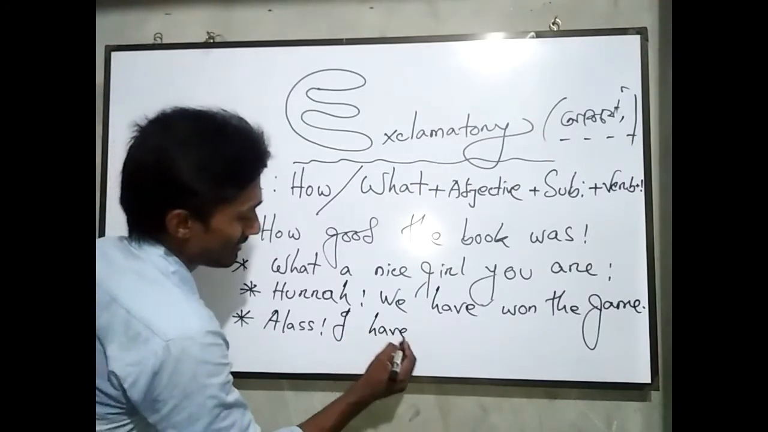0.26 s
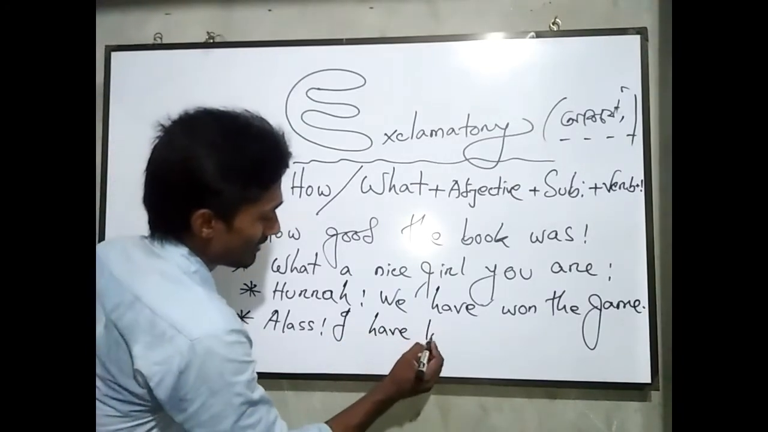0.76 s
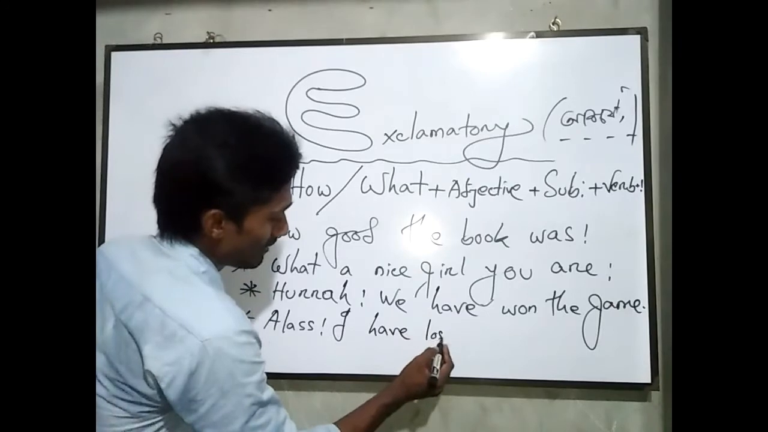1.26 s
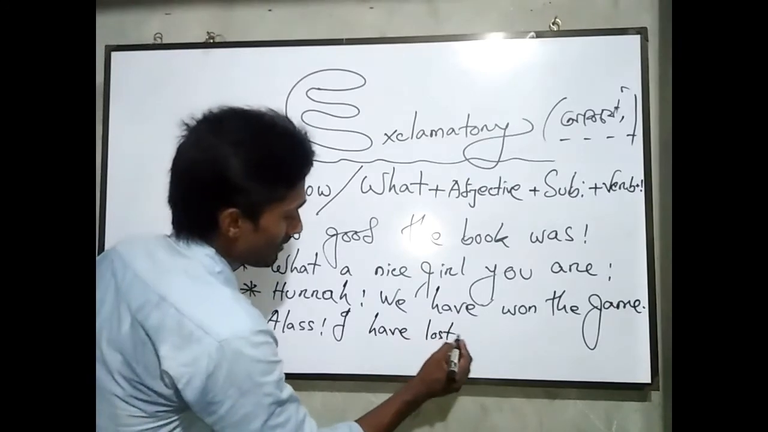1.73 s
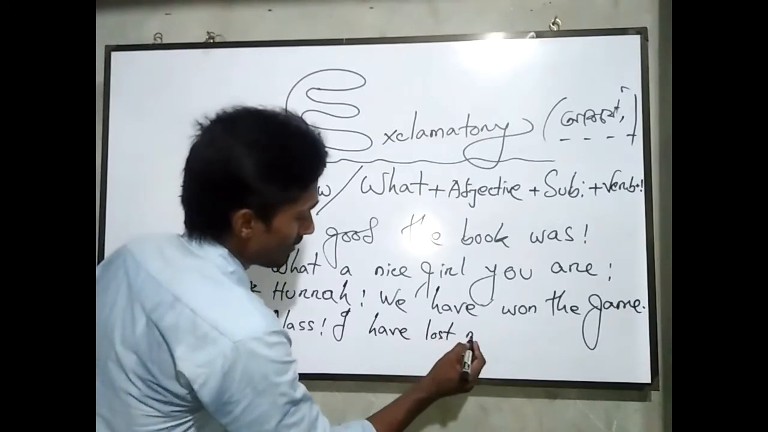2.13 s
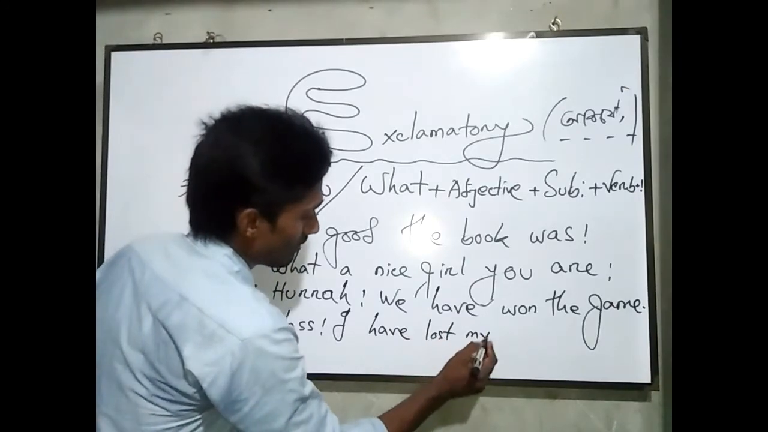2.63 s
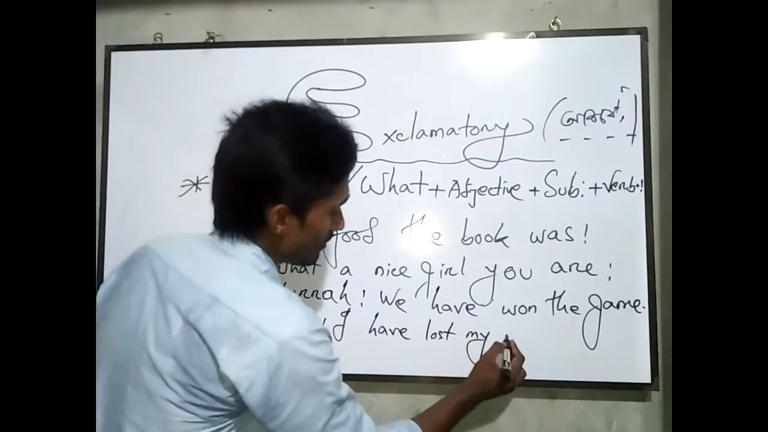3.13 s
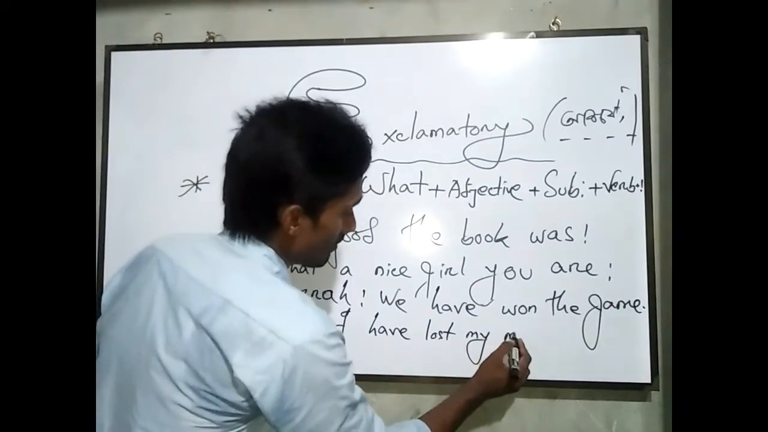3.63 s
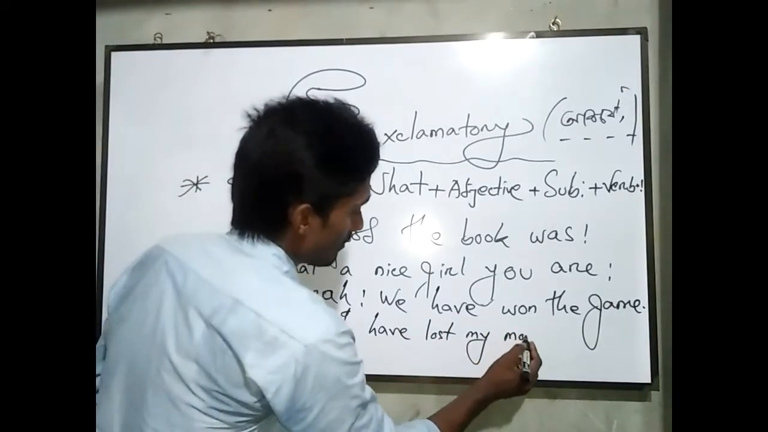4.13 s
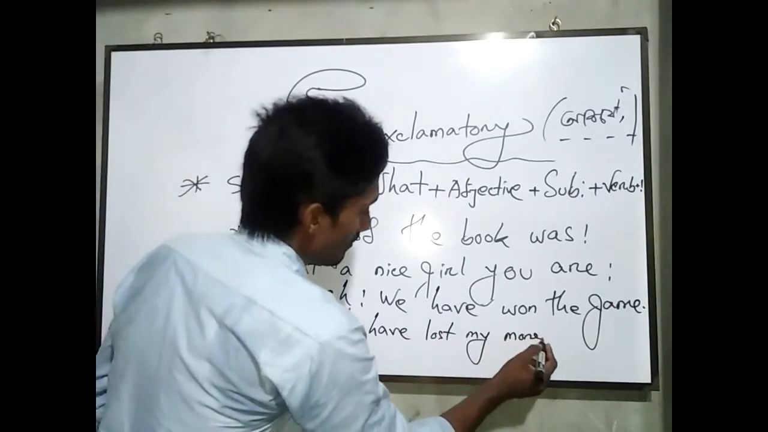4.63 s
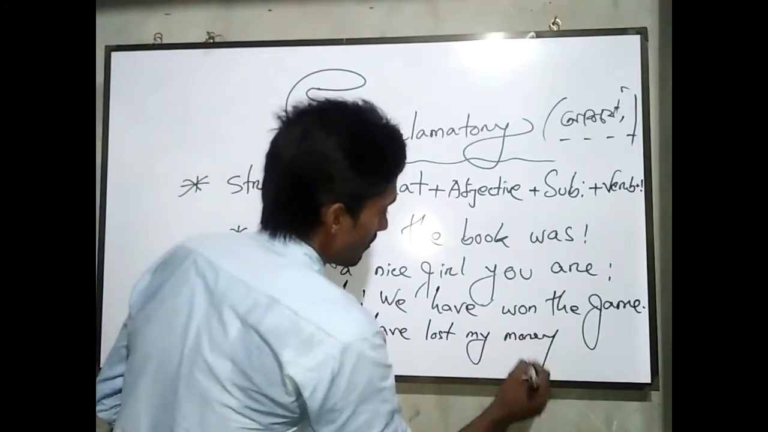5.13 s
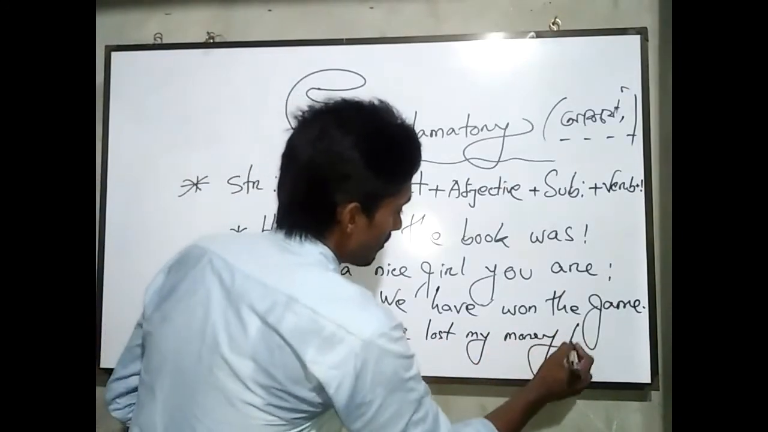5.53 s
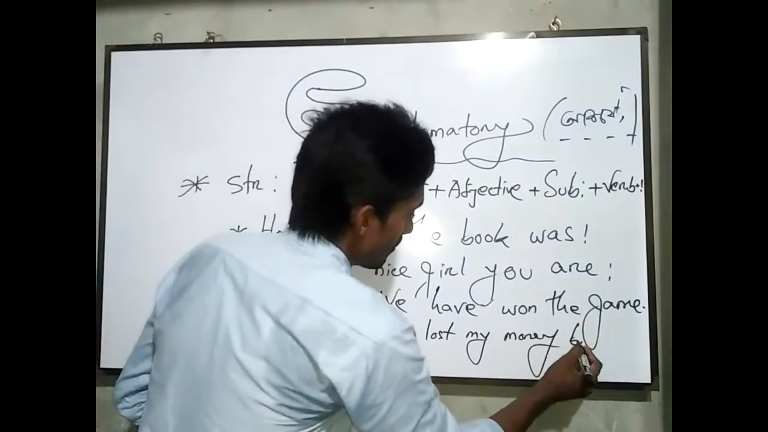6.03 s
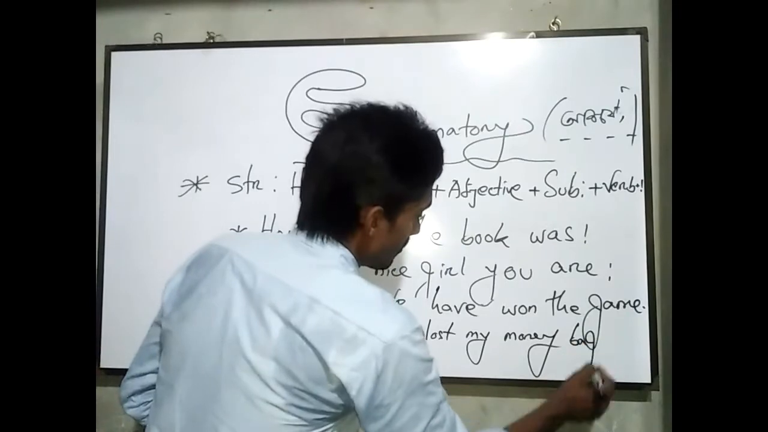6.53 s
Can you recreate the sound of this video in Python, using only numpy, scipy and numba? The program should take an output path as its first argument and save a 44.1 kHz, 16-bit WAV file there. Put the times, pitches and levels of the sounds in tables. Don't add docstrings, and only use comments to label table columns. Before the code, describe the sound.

In a bare room, a marker writes on a wall whiteboard a couple of metres from a phone. Quick, bright, dry hisses with faint barrel squeaks come in uneven bursts, mixed with small tip ticks and occasional knuckle knocks. Soft hand thuds fall mostly in the first four seconds, hardest just before two. A low fan drone, room rumble and light hiss dominate, and a distant machine hum rises late.

```python
import sys
import numpy as np
from scipy import signal
from scipy.fft import rfft, irfft, next_fast_len
from scipy.io import wavfile
from scipy.ndimage import uniform_filter1d
from numba import njit

SR = 44100
rng = np.random.default_rng(int(sys.argv[2]) if len(sys.argv) > 2 else 0)


def transcribe(signal):
    frames = np.atleast_2d(signal).T
    limited = np.clip(frames, -1, 1)
    pcm = np.round(limited * 32767).astype(np.int16)
    wavfile.write(sys.argv[1], SR, pcm)


def boost(x):
    u = np.asarray(x, float) / 20
    return 10 ** u


N = 298599

# f/Hz, density/dB per Hz
AIR_SPECTRUM = [(36, -17), (60, -16), (100, -20), (250, -24), (600, -38.5), (1000, -41), (1500, -46.5),
                (2500, -53), (4000, -54), (6700, -55.5), (7200, -51), (7700, -55.5), (11500, -59.5),
                (14500, -56)]
# t/s, gain/dB
MACHINE_GAIN = [(0, -3), (.5, -9), (4.2, -8.5), (5.0, -1), (6.77, 0)]
# f/Hz, width/Hz, level/dB
MACHINE_BANDS = [
    (67.7, 8, -50),
    (155.1, 8.9, -62),
]
# t/s, level/dB
FAN_DRONE = [(0.0, -41.5), (0.43, -51), (2.75, -42), (2.94, -50), (3.67, -43), (3.71, -47.5), (4.54, -43),
             (4.58, -56), (4.84, -42), (4.88, -55.5), (5.19, -38.5), (5.24, -46.5), (6.75, -43),
             (6.77, -51)]
# f/Hz, width/Hz, level/dB
BLADE_BANDS = [
    (52.06, 11.7, 0),
]
# f/Hz, width/Hz, level/dB
MOTOR_BANDS = [(98.4, 2.6, -64.5), (155.4, 13.6, -70), (202.8, 14.7, -64.5), (252.9, 19.7, -66.5),
               (317.7, 36, -72), (133.2, 7.2, -64.5)]
# t/s, peak/dB, boom re peak/dB
HAND_THUDS = [
    (0.514, -40.5, -2.5),
    (0.761, -61, -3),
    (1.47, -51, 10),
    (1.731, -48, 6),
    (1.909, -34, -4.5),
    (2.471, -49.5, 8),
    (3.13, -55.5, 3),
    (3.902, -47.5, 0),
]
# f/Hz, level/dB, t60/s
BOARD_MODES = [(306, 0, 0.036), (348, 3.5, 0.08), (417, 2.5, 0.039), (554, -5, 0.051), (714, -16, 0.076)]
# f/Hz, level/dB, t60/s
BOOM_MODES = [(73, -13, 0.2), (96, 7, 0.16), (126.4, 10, 0.13)]
# t/s, peak/dB, ring f/Hz
KNUCKLE_KNOCKS = [(1.175, -50, 498), (1.547, -58, 625), (3.041, -55, 533), (5.243, -50, 507),
                  (5.432, -52, 417)]
# t/s, peak/dB, ring f/Hz, treble re peak/dB
TIP_LANDINGS = [(0.3838, -57.5, 1410, 8), (0.418, -66.5, 1410, 15.5), (1.3544, -71, 1380, -3),
                (1.547, -57, 1150, -12), (3.9444, -61, 1110, -7), (4.1094, -56, 1140, -16),
                (4.323, -66, 1540, -8), (4.5211, -54.5, 1110, -17), (4.8179, -50.5, 1070, -16),
                (5.5177, -54.5, 1670, -25), (5.683, -52, 1310, -14), (6.3028, -55.5, 1680, -25),
                (6.4194, -58, 1210, -10), (0.3007, -55.5, 1910, -9), (1.0919, -60, 2240, -10),
                (1.7245, -58, 1760, -10), (2.4708, -64, 2110, -4), (3.036, -56.5, 2120, 0),
                (3.1233, -58.5, 2030, -8), (3.2465, -66, 2010, -13), (3.3039, -61, 2020, -14),
                (3.9115, -59.5, 2120, -9), (5.4261, -62, 2090, 0), (5.6256, -63, 2000, 4)]
# t/s, length/s, level/dB, centre f/Hz
NIB_SCUFFS = [
    (0.408, .06, -68, 6000),
    (2.764, 0.22, -64.5, 3100),
    (2.77, 0.18, -69, 5830),
]
# t/s, length/s, level/dB, pitch f/Hz
BARREL_SQUEAKS = [(0.15, 0.029, -66, 1390), (0.39, 0.25, -69.5, 1450), (0.642, 0.069, -63.5, 1395),
                  (0.917, 0.066, -68.5, 1290), (1.704, 0.28, -62, 1400), (2.086, 0.03, -66, 1420),
                  (2.201, 0.084, -61.5, 1380), (2.382, 0.085, -68, 1360), (2.556, 0.078, -70, 1310),
                  (2.785, 0.14, -63, 1316), (3.278, 0.035, -68, 1300), (3.51, 0.041, -64.5, 1310),
                  (3.702, 0.048, -68, 1250), (3.821, 0.11, -65.5, 1280), (4.034, 0.091, -69.5, 1210),
                  (4.329, 0.039, -71, 1440), (4.383, 0.035, -63, 1200), (4.5, 0.172, -71.5, 1150),
                  (4.757, 0.095, -66, 1090), (4.874, 0.17, -65.5, 1160), (5.229, 0.21, -65.5, 1340),
                  (5.495, 0.086, -66.5, 1350), (5.67, 0.06, -63.5, 1230), (5.83, 0.091, -65.5, 1220),
                  (6.298, 0.033, -63.5, 1420), (6.62, 0.112, -65, 1267)]
# f/Hz, width/Hz, level/dB
PANEL_MODES = [(1100, 220, -1), (1680, 280, 1), (2300, 260, 0), (2700, 300, -2)]
# t/s, modes level/dB
FRAME_RINGING = [(0, -4), (2.7, -4), (2.8, -12), (3.0, -8), (4.2, 3), (5.0, 4), (6.77, 2)]
# t/s, length/s, hiss level/dB, rasp re hiss/dB
PULL_STROKES = [(0.55, 0.077, -64.5, -6.5), (0.8, 0.15, -68, -2.5), (1.82, 0.026, -63, -6),
                (1.93, 0.032, -69, -12), (2.5, 0.14, -68, -1), (2.86, 0.12, -59.5, -13),
                (3.43, 0.076, -66, -4.5), (3.64, 0.12, -68, -1.5), (3.97, 0.13, -68.5, 0.5),
                (4.7, 0.072, -66.5, 0), (5.55, 0.081, -62.5, -7), (5.78, 0.12, -63, -8),
                (6.33, 0.12, -63.5, -5.5), (6.6, 0.16, -60, -16)]
# t/s, length/s, hiss level/dB, rasp re hiss/dB
FLICK_STROKES = [(0.0, 0.077, -68, 2), (1.085, 0.065, -70.5, 5), (1.25, 0.034, -65, -3),
                 (1.353, 0.051, -64, -11), (1.735, 0.08, -65, -5), (2.015, 0.1, -62.5, -7.5),
                 (2.31, 0.055, -64, -2.5), (3.03, 0.042, -66, 0.5), (3.35, 0.078, -67.5, -3.5),
                 (4.322, 0.11, -66, 1.5), (4.517, 0.15, -64.5, 2), (4.997, 0.21, -62.5, -8.5),
                 (5.49, 0.042, -63.5, -3), (5.681, 0.095, -61, -3)]
# t/s, length/s, hiss level/dB, rasp re hiss/dB
LOOP_STROKES = [(0.15, 0.11, -68, 1), (0.24, 0.37, -68, -6), (1.14, .085, -70.5, -4), (1.44, 0.078, -75, 3),
                (1.51, 0.084, -67, -5), (2.1, .07, -71, -6), (2.215, 0.074, -66.5, -8),
                (2.7, 0.31, -62, -11), (3.55, 0.17, -74, -1), (4.2, 0.11, -81, 3), (4.37, 0.1, -73.5, 6.5),
                (4.645, 0.063, -67.5, -0.5), (4.825, 0.17, -61.5, -2.5), (5.15, .22, -61.5, -7),
                (6.0, 0.26, -70, -1), (6.47, 0.19, -66.5, -6)]
# t/s, hiss centre f/Hz
PEN_TILT = [(0.0, 10900), (2.79, 11400), (3.37, 9700), (3.98, 10800), (4.07, 10400), (5.39, 11000),
            (5.45, 10300), (6.77, 11000)]
NIB_HZ = [8290, 9100, 10400, 11650, 12820]

AIR_DB = -56.5
BUFFET_DB, GUST_DB, GUSTS_PER_S = -36, 3, 5.7
ROOM_T60_S, ROOM_DB = 0.3, -9
TOUCH_S, BOOM_RISE_S = 0.0013, 0.0091
REBOUND_S, REBOUND_DB = 0.0029, -1.5
SCUFF_WIDTH = 0.48
ATTACK_S, LIFT_S = 0.012, 0.042
PULL_SWELL_DB, FLICK_FADE_DB, LOOP_ARCH_DB = 7, 9.5, 7.5
HISS_REST_DB, RASP_REST_DB, BARREL_REST_DB = -78, -80, -78
SQUEAK_EDGE_S, SQUEAK_BEND, SQUEAK_ARCH_DB = 0.014, 0.046, 9
RASP_HZ, RASP_WIDTH_HZ = 2285, 1730
PANEL_LAG_S = 0.03
HAND_WAVER_DB, WAVERS_PER_S = 1, 25
SKIRT_DB, SKIRT_FROM_RASP_DB = -16, -7.5


def level(x, db):
    return x * boost(db) / np.sqrt(np.mean(x ** 2))


def columns(table):
    s, *rest = np.transpose(table)
    return [np.interp(np.arange(N) / SR, s, c) for c in rest]


@njit
def svf(x, hz, width):
    y, b, l = np.empty(len(x)), 0., 0.
    for i in range(len(x)):
        g, k = np.tan(np.pi * hz[i] / SR), width / hz[i]
        v = (b + g * (x[i] - l)) / (1 + g * (g + k))
        b, l, y[i] = 2 * v - b, l + 2 * g * v, k * v
    return y


def band(x, hz, width_hz):
    hz = hz + np.zeros(N)
    return svf(svf(x, hz, 1. * width_hz), hz, 1. * width_hz)


def noise_band(hz, width_hz):
    return band(rng.standard_normal(N), hz, width_hz)


def steady(x, share):
    envelope = np.abs(signal.hilbert(x, next_fast_len(N))[:N])
    return x / (envelope + .2 * np.std(x)) ** share


def walk(rate):
    k = int(SR / rate)
    return uniform_filter1d(np.repeat(rng.standard_normal(N // k + 1), k), k)[:N]


def slips(scatter_db, rate):
    return rng.standard_normal(N) * boost(scatter_db * walk(rate))


def ring(modes, length_s):
    t = np.arange(int(length_s * SR)) / SR
    return sum(boost(db) * np.sin(2 * np.pi * hz * t) * np.exp(-np.log(1000) * t / t60)
               for hz, db, t60 in modes)


def add(out, s, sound):
    i = int(s * SR)
    out[i:i + len(sound)] += sound[:N - i]


def gesture(s, length_s, rise_s, fall_s):
    t = np.arange(N) / SR - s
    contact = np.clip(t / rise_s, 0, 1) * np.clip(1 - (t - length_s) / fall_s, 0, 1)
    return contact, np.clip(t / length_s, 0, 1)


def air():
    hz, db = np.transpose(AIR_SPECTRUM)
    size = next_fast_len(N)
    grid_hz = np.arange(size // 2 + 1) * SR / size + 1
    shape = boost(np.interp(np.log(grid_hz), np.log(hz), db, left=-99, right=-99))
    noise = irfft(rfft(rng.standard_normal(size)) * shape, size)[:N]
    audible = signal.sosfilt(signal.butter(4, 80, "high", fs=SR, output="sos"), noise)
    return noise * boost(AIR_DB + 0.1 * walk(1.5)) / np.std(audible)


def machine():
    hum = sum(level(steady(noise_band(f, w), .3), db) for f, w, db in MACHINE_BANDS)
    return boost(columns(MACHINE_GAIN)[0]) * hum


def fan():
    drone_db, = columns(FAN_DRONE)
    buffet_db = BUFFET_DB + GUST_DB * walk(GUSTS_PER_S)
    buffet = level(band(noise_band(17, 13), 17, 13), 0)
    buffet = level(steady(buffet, 0.31), 0)
    drone = sum(level(steady(noise_band(f, w), 0.24), db) for f, w, db in BLADE_BANDS)
    motor = sum(level(noise_band(f, w), db) for f, w, db in MOTOR_BANDS)
    return boost(buffet_db) * buffet + boost(drone_db) * level(drone, 0) + motor


def room(x):
    t = np.arange(int(.4 * SR)) / SR
    tail = rng.standard_normal(len(t)) * np.exp(-np.log(1000) * t / ROOM_T60_S) * (t > .006)
    tail = boost(ROOM_DB) * tail / np.sqrt(np.sum(tail ** 2))
    return x + signal.fftconvolve(x, tail)[:N]


def thuds():
    out = np.zeros(N)
    push = np.hanning(int(TOUCH_S * SR))
    board = np.convolve(ring(BOARD_MODES, .2), push / push.sum())
    t = np.arange(int(.25 * SR)) / SR
    boom = ring(BOOM_MODES, .25) * (1 - np.exp(-t / BOOM_RISE_S))
    for s, db, boom_db in HAND_THUDS:
        for lag_s, share_db in [(0, -8.5), (.006, -6.5), (.016, -5)]:
            add(out, s + lag_s, boost(db + share_db) * board)
        add(out, s, boost(db + boom_db - 1.5) * boom)
    return out


def knocks():
    out = np.zeros(N)
    for s, db, hz in KNUCKLE_KNOCKS:
        add(out, s, boost(db) * ring([(hz, -1.5, .07), (1.4 * hz, -5, .05)], .1))
    return out


def ticks():
    out, t = np.zeros(N), np.arange(int(.03 * SR)) / SR
    decay = np.exp(-t / .002) + .3 * np.exp(-t / .012)
    for s, db, hz, treble_db in TIP_LANDINGS:
        modes = [(hz, -1, .022), (.62 * hz, -6, .02), (1.55 * hz, -5, .012), (2.3 * hz, -7, .008)]
        grit = rng.standard_normal(len(t) + 1)
        crack = (grit[1:] - .75 * grit[:-1]) * decay
        tick = ring(modes, .03) + boost(treble_db) * crack
        add(out, s, boost(db) * tick)
        add(out, s + REBOUND_S, boost(db + REBOUND_DB) * tick)
    return out


def scuffs():
    out = 0
    for s, length_s, db, hz in NIB_SCUFFS:
        _, along = gesture(s, length_s, ATTACK_S, LIFT_S)
        arch = np.sin(np.pi * along ** 0.86)
        out = out + arch * level(band(slips(0.67, rate=70.), hz, SCUFF_WIDTH * hz), db)
    return out


def strokes():
    hiss, rasp = boost(HISS_REST_DB), boost(RASP_REST_DB)
    shapes = [(PULL_STROKES, lambda a: -PULL_SWELL_DB * (1 - a)),
              (FLICK_STROKES, lambda a: -FLICK_FADE_DB * a),
              (LOOP_STROKES, lambda a: -LOOP_ARCH_DB * (2 * a - 1) ** 2)]
    for rows, shape_db in shapes:
        for s, length_s, db, rasp_db in rows:
            contact, along = gesture(s, length_s, ATTACK_S, LIFT_S)
            speed = contact * boost(db + shape_db(along))
            hiss = np.hypot(hiss, speed)
            rasp = np.hypot(rasp, boost(rasp_db) * speed)
    return hiss, rasp


def squeaks():
    start_s, span_s, _, pitch_hz = np.transpose(BARREL_SQUEAKS)
    gain = boost(BARREL_REST_DB)
    hz = np.interp(np.arange(N) / SR, start_s + span_s / 2, pitch_hz)
    for s, length_s, db, f in BARREL_SQUEAKS:
        contact, along = gesture(s, length_s, SQUEAK_EDGE_S, SQUEAK_EDGE_S)
        arch = np.sin(np.pi * along ** (0.51 + 1.9 * length_s)) - .6
        gain = np.hypot(gain, contact * boost(db + SQUEAK_ARCH_DB * arch))
        hz = np.where(contact > 0, f * (1 + SQUEAK_BEND * arch), hz)
    return gain, hz


def barrel():
    press, hz = squeaks()
    narrow = steady(band(slips(1.5, rate=40.), hz, 280), .4)
    broad = band(slips(1.5, rate=40.), 1.15 * hz, 800)
    return boost(-1.5) * press * (level(narrow, -1.5) + level(broad, -10))


def panel(rasp):
    drive = uniform_filter1d(rasp, int(PANEL_LAG_S * SR))
    rub = slips(2.2, rate=60.)
    modes = sum(boost(db + 3.5 * walk(16)) * band(rub, f * (1 + .03 * walk(4)), w)
                for f, w, db in PANEL_MODES)
    ringing = boost(columns(FRAME_RINGING)[0])
    coarse = band(slips(4.6, rate=66.0), RASP_HZ, RASP_WIDTH_HZ)
    sheet = (coarse + ringing * modes) / np.sqrt(1 + 0.37 * ringing ** 2)
    return drive * level(sheet, -0.54)


def felt(hiss, rasp):
    hz = columns(PEN_TILT)[0] * (1 + .04 * walk(12))
    fibres = band(slips(1.45, rate=85.0), hz, 8100)
    nib = sum(boost(3.0 * walk(20)) * noise_band(f * (1 + .03 * walk(9)), 550) for f in NIB_HZ)
    bright = level(fibres, 2.5) + level(nib, -5)
    bright = level(bright - .6 * band(bright, 13000, 2300), 0)
    skirt = level(band(slips(3.2, rate=100.0), 6970, 5100), -0.77)
    skirt_gain = np.hypot(boost(SKIRT_DB) * hiss, boost(SKIRT_FROM_RASP_DB) * rasp)
    waver = boost(HAND_WAVER_DB * walk(WAVERS_PER_S))
    return waver * hiss * bright + skirt_gain * skirt


def scene():
    hiss, rasp = strokes()
    hand = thuds() + knocks()
    pen = ticks() + scuffs() + barrel() + panel(rasp)
    return (air() + machine() + fan() + room(hand + pen) + felt(hiss, rasp))[None]


def top_cut(x):
    return signal.sosfilt(signal.butter(12, 15000, fs=SR, output="sos"), x)


def record(dry):
    top = signal.ellip(10, .2, 40, 14270, fs=SR, output="sos")
    mix = signal.sosfilt(top, dry)
    return top_cut(mix)


dry = scene()
out = record(dry)
transcribe(out)
```